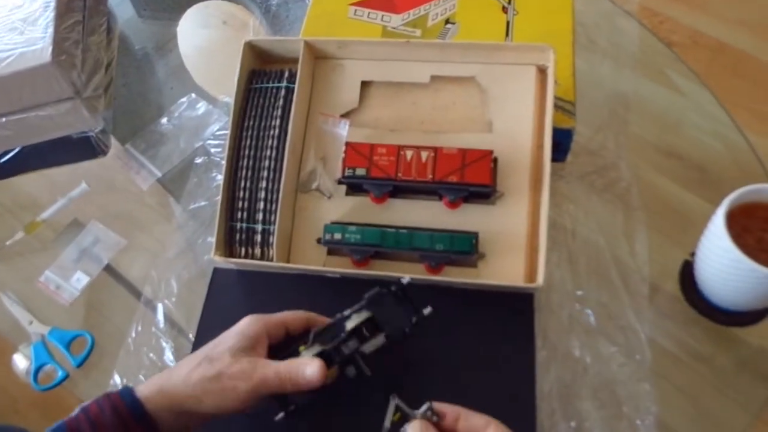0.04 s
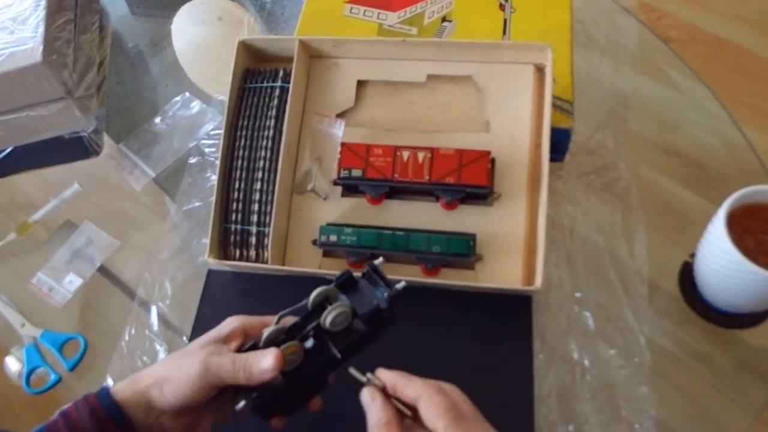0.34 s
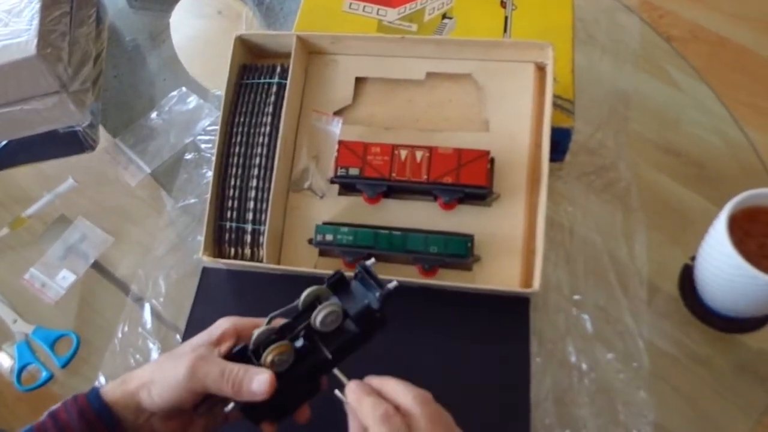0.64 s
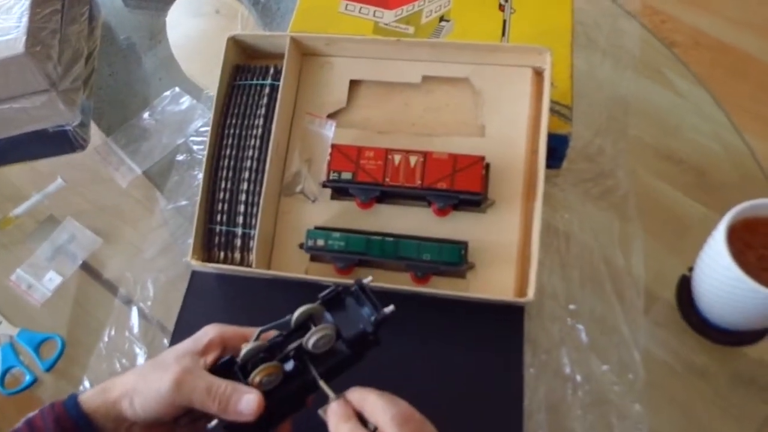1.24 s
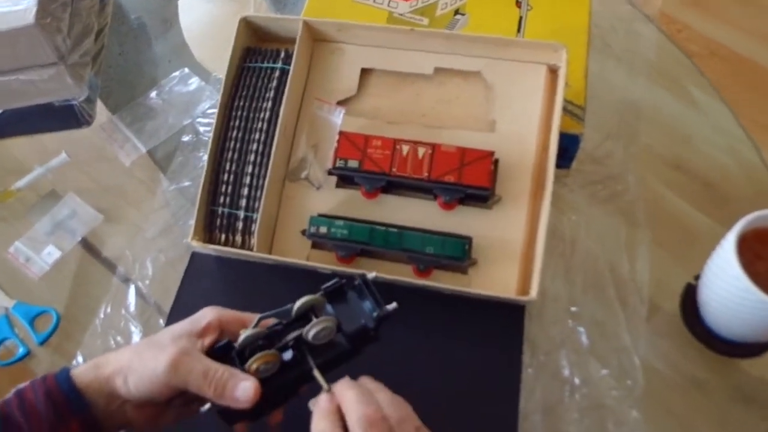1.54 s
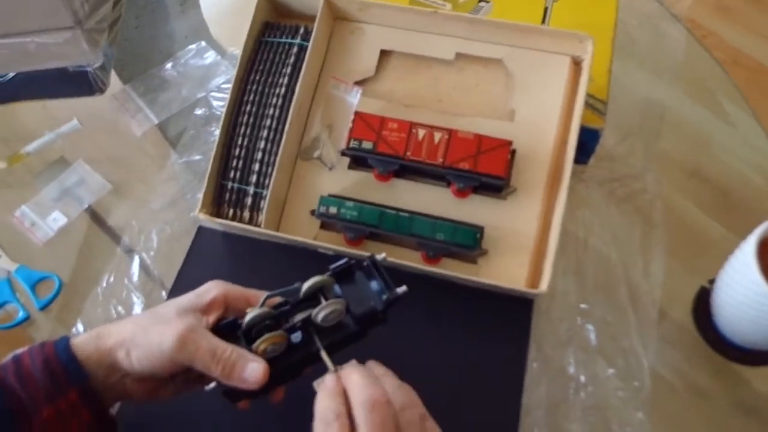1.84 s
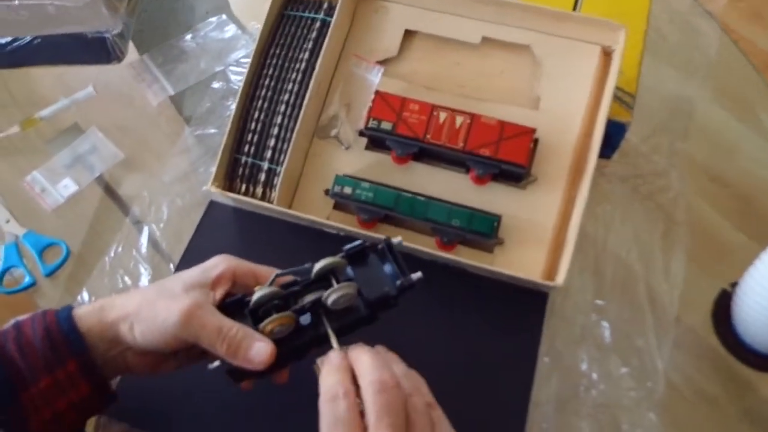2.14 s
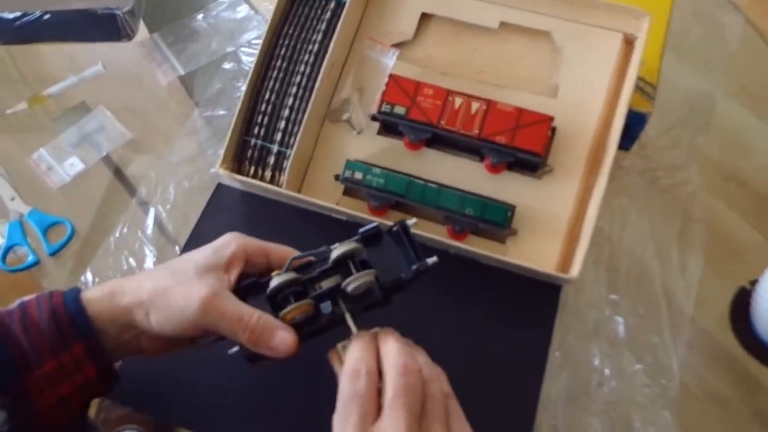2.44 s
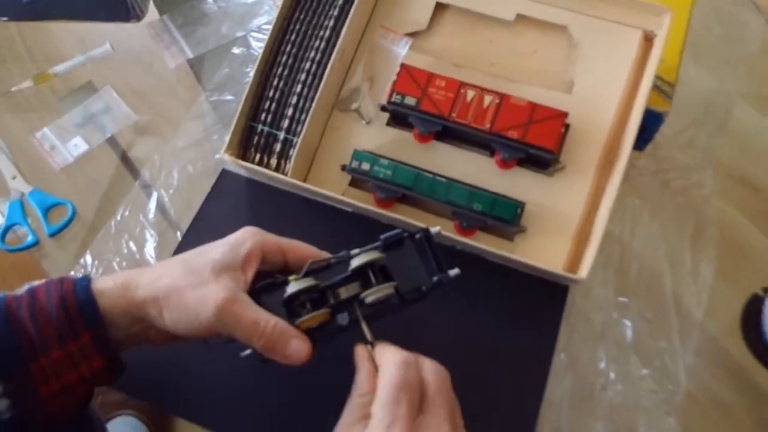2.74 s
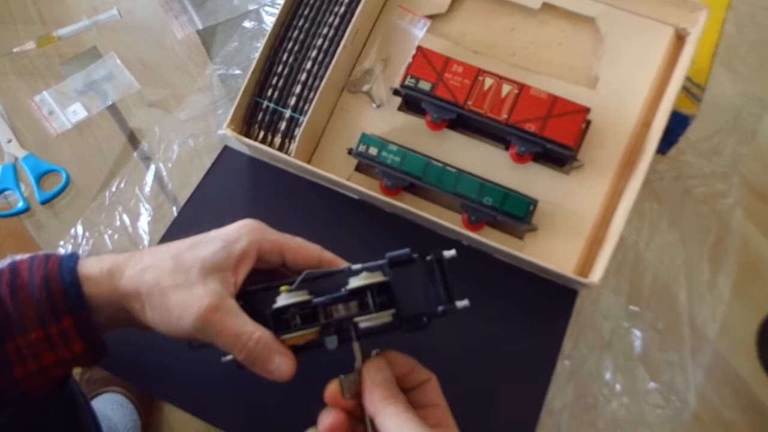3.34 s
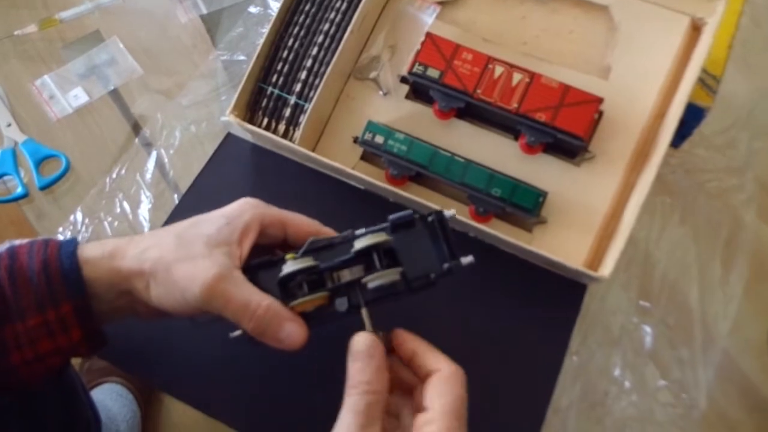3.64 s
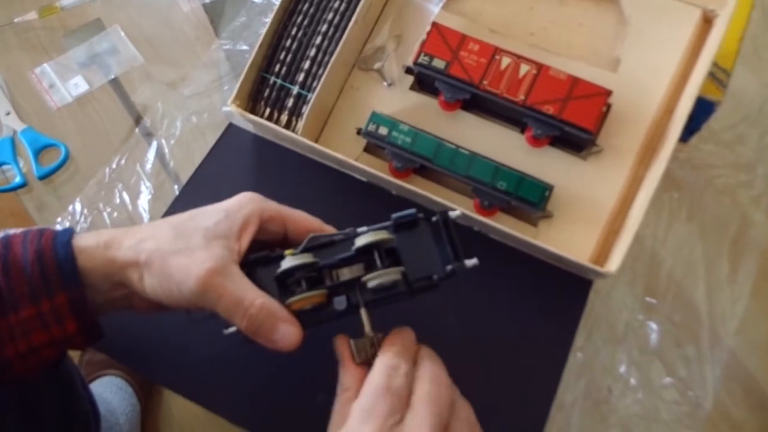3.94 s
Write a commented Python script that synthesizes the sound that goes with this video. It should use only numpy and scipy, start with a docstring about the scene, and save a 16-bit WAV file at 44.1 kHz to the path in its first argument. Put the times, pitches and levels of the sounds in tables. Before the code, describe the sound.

Sharp metallic ratchet clicks come from a toy train being wound with a key. Soft taps and small scrapes of fitting the key come first, then louder irregular clicking, close to the microphone indoors over faint room rumble.

```python
"""A quiet room, a stereo pair of microphones close to a tinplate clockwork locomotive being wound.
The key ticks against the arbor and grinds in its hole, then the ratchet snaps in uneven bursts, twice
leaving the pawl spring buzzing. Each contact rings the hand-damped key or chassis for a few milliseconds
and leaves a short bright room tail, over a low rumble and hiss."""
import sys
import numpy as np
from scipy import signal
from scipy.fft import rfft, irfft
from scipy.io import wavfile

SR = 44100
rng = np.random.default_rng(int(sys.argv[2]) if len(sys.argv) > 2 else 0)


def generate_wav(signal):
    """Clip the signal to [-1, 1] and save it as 16-bit WAV at the path in sys.argv[1]."""
    frames = np.transpose(np.atleast_2d(signal))
    scaled = np.clip(frames, -1, 1) * 32767
    pcm = np.round(scaled).astype(np.int16)
    wavfile.write(sys.argv[1], SR, pcm)


N = 176400
TIME = np.arange(N) / SR
CLICK_SAMPLES = 2048

# Resonances of the key on its arbor. Each row: pitch in Hz, width in Hz, relative level in dB.
KEY_MODES = [(1600, 170, 6), (1840, 150, 3), (2410, 110, -3), (2860, 200, 4), (4760, 160, 9),
             (5280, 200, 1), (5950, 450, 2), (7300, 400, -3), (8400, 600, 0), (10000, 700, 0),
             (14000, 1200, 3)]


def from_db(db):
    """Decibels to gain."""
    return 10 ** (np.asarray(db) / 20)


def at_hz(points, hz):
    """Read a table on a log-frequency axis."""
    frequency, value = np.transpose(points)
    return np.interp(np.log(hz + 1), np.log(frequency), value)


def band(x, low, high, order=2):
    """Butterworth band-pass, edges in Hz."""
    sos = signal.butter(order, [low, min(high, .48 * SR)], "band", fs=SR, output="sos")
    return signal.sosfilt(sos, x)


def resonance(x, hz, width):
    """Two-pole resonance with gain 1 at its peak."""
    r = np.exp(-np.pi * width / SR)
    feedback = [1, -2 * r * np.cos(2 * np.pi * hz / SR), r * r]
    return signal.lfilter(np.array([1, 0, -1]) * (1 - r * r) / 2, feedback, x)


def place(clicks, times, db):
    """Lay stereo clicks on the time line, each with the energy of six milliseconds at its level."""
    energy = (clicks ** 2).sum(-1, keepdims=True).mean(1, keepdims=True)
    clicks = clicks / np.sqrt(energy / (.006 * SR))
    out = np.zeros((2, N + CLICK_SAMPLES))
    for click, start, gain in zip(clicks, times, from_db(db)):
        i = int(start * SR)
        out[:, i:i + CLICK_SAMPLES] += gain * click
    return out[:, :N]


def room_tone():
    """Low rumble and thin hiss, louder once the ratchet starts to snap."""
    # Loudness of the room tone. Each row: time in seconds, level in dB.
    levels = [(0, -63.5), (.2, -63), (.45, -67.5), (.75, -69), (1.1, -66.5), (1.3, -63), (1.42, -55.5),
              (1.7, -63.5), (1.9, -63.5), (1.95, -50), (2.2, -53.5), (2.55, -59.5), (2.62, -51),
              (2.93, -54), (3.03, -47.5), (3.4, -50.5), (3.7, -52), (4, -59)]
    # Its colour. Each row: frequency in Hz, relative spectral density in dB.
    colour = [(20, 5), (45, -7), (66, 0), (90, -12), (120, -9.5), (170, -15.5), (280, -20), (400, -19),
              (600, -25), (1100, -29.5), (2000, -33), (4000, -36), (8000, -38), (16000, -38.5)]
    # Its likeness at the two microphones. Each row: frequency in Hz, correlation.
    likeness = [(50, 0.48), (110, 0.4), (220, 0.35), (1000, 0.28), (8000, 0.19), (16000, .01)]
    hz = np.fft.rfftfreq(N, 1 / SR)
    mid, side = rfft(rng.standard_normal((2, N)))
    alike = at_hz(likeness, hz)
    stereo = np.sqrt(1 + alike) * mid + np.sqrt(1 - alike) * side * [[1], [-1]]
    air = irfft(stereo * from_db(at_hz(colour, hz)), N)
    return air / air.std() * from_db(np.interp(TIME, *np.transpose(levels)))


def contact_force(rise):
    """Metal meets metal: a sharp touch, weaker for a slow rise, and micro-contacts that swell and die."""
    chatter_db, hold_s, chatter_t60_s = -14, 0.00052, 0.031
    apart_db, soft_rise_s = -10, 0.0063
    t = TIME[:CLICK_SAMPLES]
    noise = rng.standard_normal((len(rise), 3, CLICK_SAMPLES))
    chatter = noise[:, :1] + from_db(apart_db) * noise[:, 1:]  # a share differs between the microphones
    swell = np.minimum(t / rise, 1)
    fade = from_db(chatter_db - 60 * np.maximum(t - rise - hold_s, 0) / chatter_t60_s)
    touch = (t == np.round(rise * SR / 2) / SR) * np.exp(-rise / soft_rise_s)
    return chatter * swell * fade + touch


def metal_ring(force, modes, crack_db, detune):
    """An unpitched crack plus modes that vary at each contact in strength and, by detune, in pitch."""
    # Lead of the left microphone. Each row: frequency in Hz, phase in radians (negative is a lag).
    left_lead = [(1500, -1.12), (2300, -0.17), (3000, 1.77), (3500, 1), (4500, 0.2), (6200, 0.83),
                 (8400, 1.77), (12500, 1.31), (14500, 1.96)]
    spread_db = 1.5
    sound = from_db(crack_db) * force
    for i, draws in enumerate(rng.standard_normal((len(force), len(modes), 2))):
        for (hz, width, db), (strength, shift) in zip(modes, draws):
            mode = resonance(force[i], hz * (1 + detune * shift), width)
            sound[i] += from_db(db + spread_db * strength) * mode
    spectrum = rfft(sound)
    spectrum[:, 1] *= np.exp(-1j * at_hz(left_lead, np.fft.rfftfreq(CLICK_SAMPLES, 1 / SR)))
    return irfft(spectrum) * np.linspace(1, 0, CLICK_SAMPLES)


def room_tail(x, low, high, t60):
    """Diffuse wash in one band: a short gap, first reflections off the table and box, then the tail."""
    # Colour of the reflected sound. Each row: frequency in Hz, relative spectral density in dB.
    room_colour = [(700, -16.5), (1300, -10.5), (1650, 3), (2100, -5), (2900, -5), (3700, -4), (4700, 4.5),
                   (6300, 2.5), (7400, -0.5), (8500, 5), (10000, -1), (12500, 1.5), (14500, 11),
                   (16500, -19)]
    gap_s, build_s = 0.0054, 0.0014
    early_db, early_t60_s = 5.5, 0.12
    t = TIME[:int(.7 * SR)]
    decay = from_db(-60 * t / t60) ** 2 + from_db(early_db - 60 * t / early_t60_s) ** 2
    decay *= np.clip((t - gap_s) / build_s, 0, 1)
    power = signal.fftconvolve((x ** 2).mean(0), decay / decay.sum())[:N]
    colour = from_db(at_hz(room_colour, np.fft.rfftfreq(N, 1 / SR)))
    noise = rng.standard_normal((2, N))  # unrelated at the two microphones
    wash = band(irfft(rfft(noise) * colour, N), low, high)
    return wash / wash.std() * np.sqrt(np.maximum(power, 0))


def strikes(rows, modes, crack_db, detune):
    """Each contact knocks the body dully and rings the metal in five bands, each with its room tail."""
    # Bands of a click. Each row: lower edge in Hz, upper edge in Hz.
    bands = [(1460, 2050), (2050, 3300), (4250, 7500), (7500, 11000), (11800, 16500)]
    # How each band reaches the microphones. Each row: trim in dB, left minus right in dB,
    # room against direct sound in dB, room t60 in seconds.
    pickup = [(1, -4, -11, 0.66), (-2, -7, -8, 0.56), (-0.5, -2.5, -11.5, 0.42), (-1.5, -0.5, -10, 0.39),
              (0.5, 1.5, -17, 0.28)]
    thud_band_hz, thud_db, thud_room_db = (630, 1210), -13.5, 0.5
    grip_t60_s = 0.045  # the gripping hand damps every band alike
    damping_cycles = 470  # the metal itself loses 60 dB in this many cycles, so the treble dies first
    times, rise, *levels = np.transpose(rows)
    rise = np.maximum(rise[:, None, None], 1 / SR)
    force = contact_force(rise)
    ringing = metal_ring(force, modes, crack_db, detune)
    since_peak = np.maximum(TIME[:CLICK_SAMPLES] - rise, 0)
    knocks = resonance(band(force, *thud_band_hz), hz=770, width=520)
    thud = place(knocks, times, levels[0] + thud_db)
    out = thud + from_db(thud_room_db) * room_tail(thud, *thud_band_hz, t60=pickup[0][3])
    for (low, high), level, (trim_db, pan_db, room_db, t60) in zip(bands, levels, pickup):
        damping = from_db(-60 * since_peak * (1 / grip_t60_s + low / damping_cycles))
        direct = place(band(ringing, low, high, order=3) * damping, times, level + trim_db)
        out += direct * from_db([[pan_db / 2], [-pan_db / 2]])
        out += from_db(room_db) * room_tail(direct, low, high, t60)
    return out


def key_taps():
    """The key taps the arbor and seats on it, ringing briefly at each touch."""
    # Each row: start in seconds, rise in seconds, level in dB in each of five bands before their trim.
    taps = [(0.0728, 0.0016, -60, -61, -58, -62.5, -69), (0.3768, 0.0044, -72.5, -76, -78.5, -86, -83),
            (0.9496, 0.00051, -84, -79, -77, -77, -89), (1.2051, 0.0008, -67, -68, -74, -69, -78),
            (1.276, 0.0002, -73.5, -78, -76, -73, -91), (1.3525, 0.0015, -51, -58.5, -64.5, -65.5, -73),
            (1.4148, 0.00065, -77, -63, -62.5, -64, -72.0), (1.4579, 0.00056, -58, -76, -74.5, -90, -89),
            (1.489, 0.0021, -68.5, -80, -71, -88, -84), (1.5748, 0.0018, -77, -74.5, -71.5, -74, -87),
            (1.9184, 0.00064, -41.5, -38.0, -36, -42.5, -41.5), (2.0104, 0.00077, -59, -59, -72, -82, -70)]
    return strikes(taps, KEY_MODES, crack_db=-10.5, detune=.009)


def key_scrapes():
    """The key slides and grinds in its hole: dense tiny slips excite its lower modes."""
    # Strokes of the key. Each row: start in seconds, length in seconds, level in dB.
    strokes = [(1.357, 0.19, -78.5), (1.86, 0.14, -66.5), (2.46, 0.086, -68), (3.337, 0.055, -63)]
    slips_per_s, edge_s = 810, 0.027
    slips = (rng.random(N) < slips_per_s / SR) * rng.standard_normal(N) + 1e-18
    ringing = sum(from_db(db) * resonance(slips, hz, width) for hz, width, db in KEY_MODES)
    grind = band(ringing, low=1530, high=2540)
    envelope = sum(from_db(db) * np.clip(np.minimum(TIME - start, start + length - TIME) / edge_s, 0, 1)
                   for start, length, db in strokes)
    return grind / grind.std() * envelope


def ratchet_snaps():
    """The ratchet snaps as the key turns and rings the chassis under it."""
    # Each row: start in seconds, rise in seconds, level in dB in each of five bands before their trim.
    snaps = [(1.9711, 0.00091, -61, -49, -45, -44, -49), (2.4679, 0.0005, -68, -60, -68, -68, -74.0),
             (2.4883, 0.0015, -62, -57.5, -55, -62, -57.5),
             (2.5757, 0.00077, -54, -47.5, -42.5, -42.5, -35.5),
             (2.582, 0.0017, -54.5, -50, -44, -35.5, -53), (2.5921, 0.0009, -50.5, -41.5, -41, -36, -45),
             (2.6865, 0.00083, -50.5, -41.0, -42, -42.5, -48),
             (2.7696, 0.0012, -61.5, -54.5, -55, -62, -75.0),
             (2.8302, 0.00052, -68.0, -61.5, -59, -61, -73), (2.8394, 0.00099, -63, -57, -55.5, -60, -74.0),
             (2.8885, 0.00052, -64.5, -58.5, -55.5, -64, -76.0),
             (2.9458, 0.00072, -42.5, -38, -40, -37.5, -44.5), (2.956, 0.00047, -55, -49, -45, -47, -45),
             (2.9936, 0.00032, -41, -32, -29, -24, -24.5), (3.0846, 0.00065, -69, -52, -55.5, -64.0, -72.0),
             (3.1051, 0.00018, -60, -55, -58, -65.0, -74.0), (3.1762, 0.0015, -42.5, -35, -35.0, -32, -41),
             (3.1991, 0.00061, -57, -61, -48, -44, -45), (3.2085, 0.00184, -52, -50, -52, -44, -52),
             (3.2127, 0.00063, -36, -33, -46, -48, -49), (3.2405, 0.001, -48, -40.5, -33.5, -27.5, -32),
             (3.2468, 0.0018, -43.5, -40, -42.5, -36.5, -43), (3.2513, 0.0013, -49.5, -61, -50, -49, -47),
             (3.2637, 0.0014, -44.5, -38.5, -35.5, -34.5, -45),
             (3.3057, 0.00076, -46.5, -38.5, -36, -31, -30), (3.3166, 0.0006, -52, -42.5, -39.5, -35, -41),
             (3.374, 0.0018, -56.5, -55, -62, -60, -70), (3.4978, 0.002, -50, -55, -65, -59, -64)]
    # Resonances of the chassis. Each row: pitch in Hz, width in Hz, relative level in dB.
    chassis_modes = [(1590, 190, 3), (1830, 160, -2), (2070, 130, -1), (2520, 170, -1), (2930, 380, 2),
                     (4850, 240, -3), (5500, 140, 0), (5790, 190, 3), (6440, 350, 2), (7110, 140, -2),
                     (8350, 400, 4), (8900, 300, 2), (9700, 400, 1), (11900, 400, -7), (14550, 600, 6)]
    return strikes(snaps, chassis_modes, crack_db=-18, detune=.022)


def pawl_spring():
    """The pawl spring is left ringing after two of the snaps, a thin brief buzz."""
    # Each row: start in seconds, level in dB.
    pings = [(2.955, -40.5), (3.249, -41)]
    hz, width_hz, t60_s = 8850, 280, 0.095
    noise = rng.standard_normal((2, N))
    buzz = resonance(resonance(noise, hz, width_hz), hz, width_hz)
    fade = sum((TIME > start) * from_db(db - 60 * np.maximum(TIME - start, 0) / t60_s)
               for start, db in pings)
    return buzz / buzz.std() * fade


def scene():
    """Over the room tone, the key is seated and the clockwork wound."""
    return room_tone() + key_taps() + key_scrapes() + ratchet_snaps() + pawl_spring()


def record(dry):
    """The top is cut steeply above 16.4 kHz."""
    return signal.sosfilt(signal.ellip(10, .1, 70, 16400, fs=SR, output="sos"), dry)


dry = scene()
out = record(dry)
generate_wav(out)
```